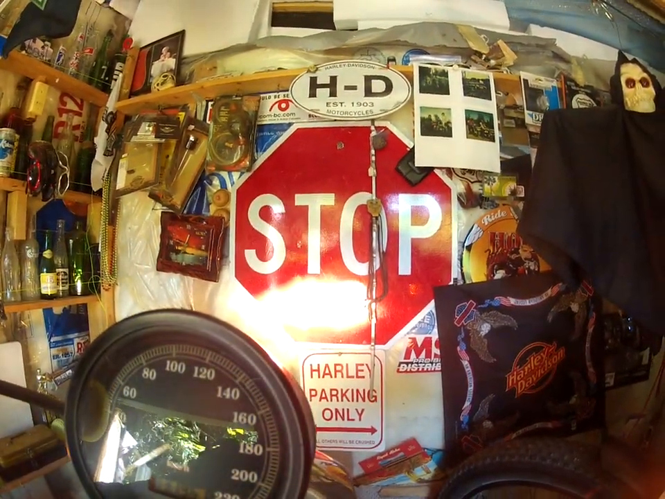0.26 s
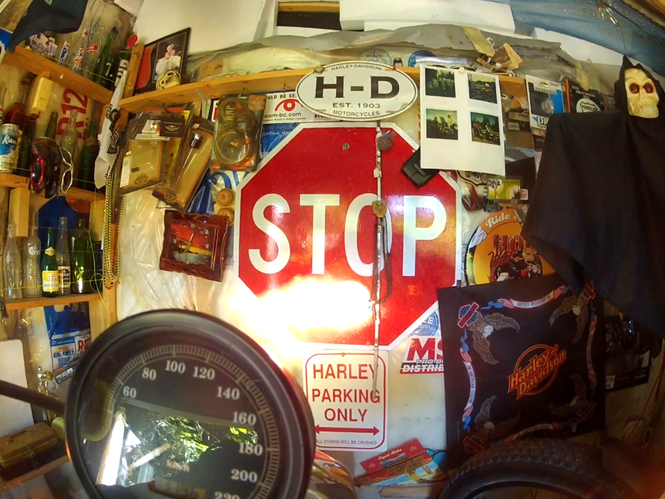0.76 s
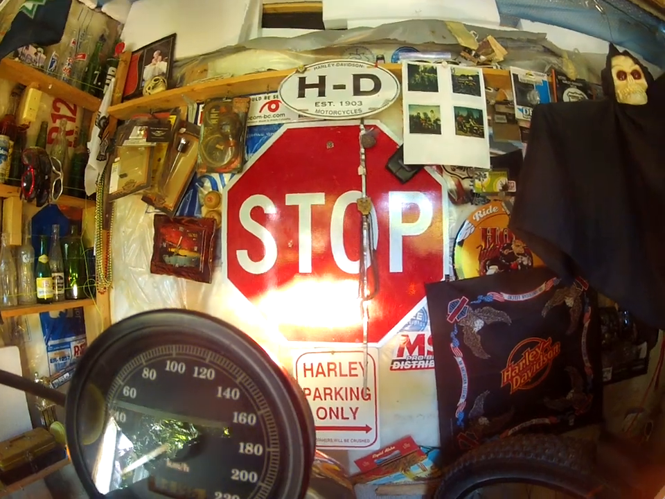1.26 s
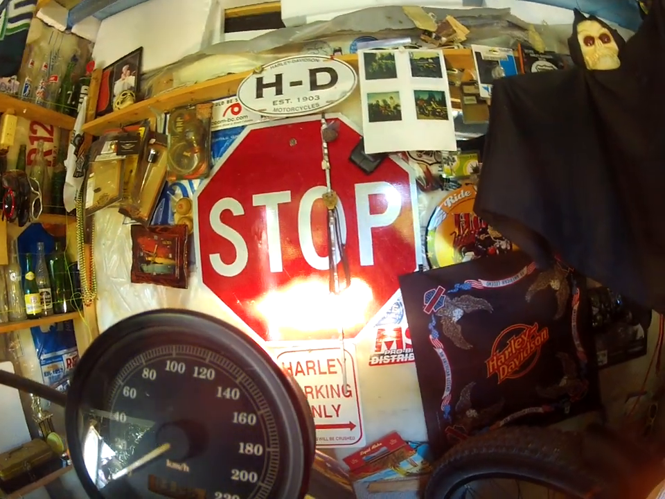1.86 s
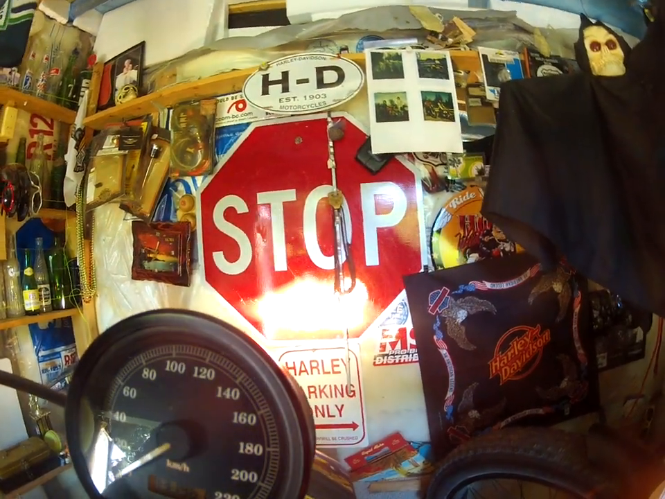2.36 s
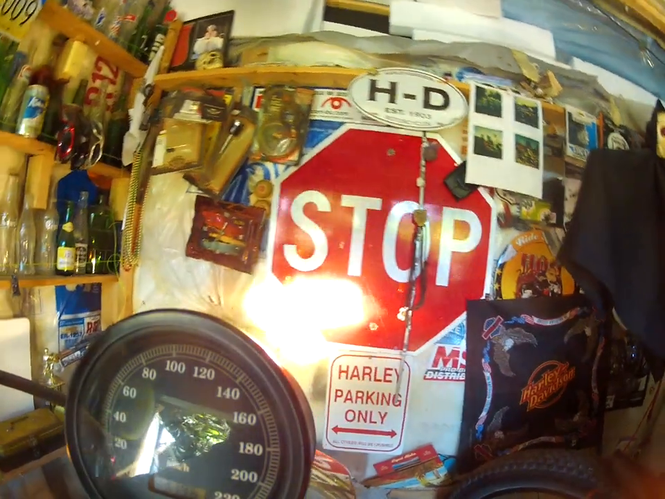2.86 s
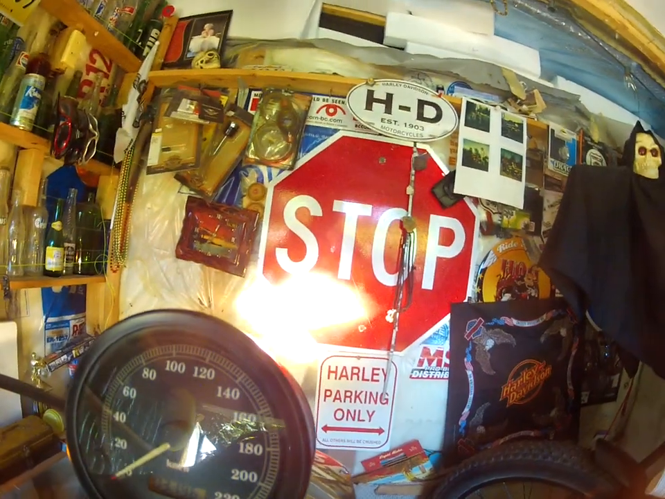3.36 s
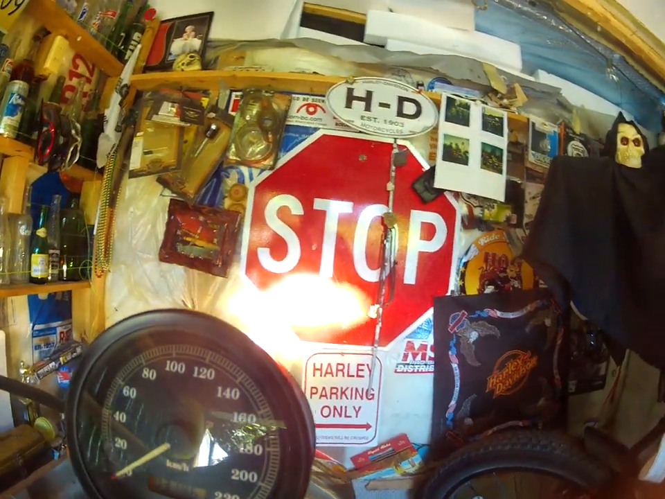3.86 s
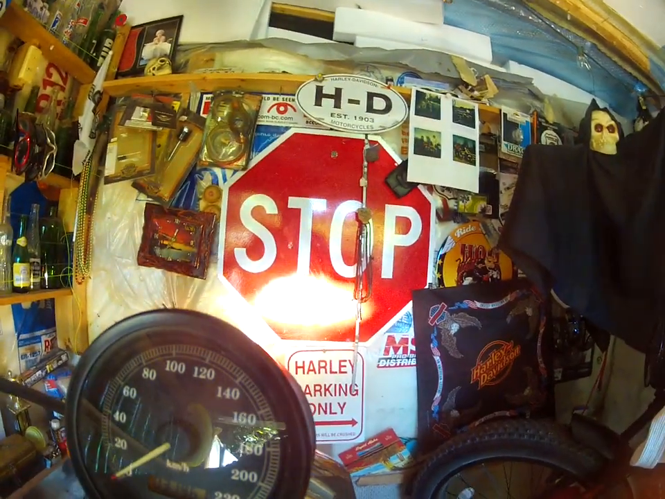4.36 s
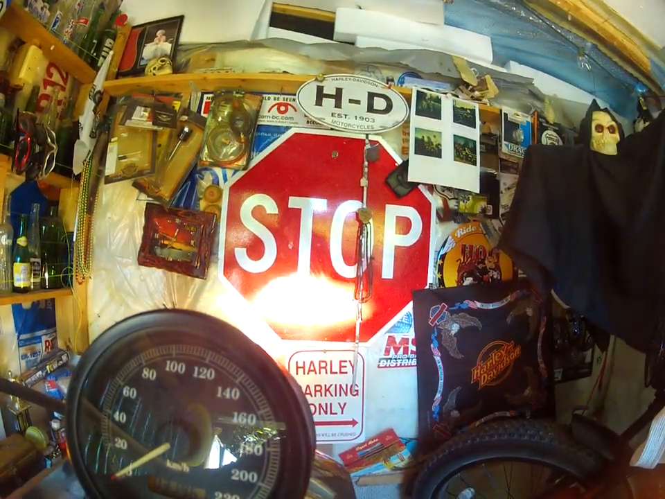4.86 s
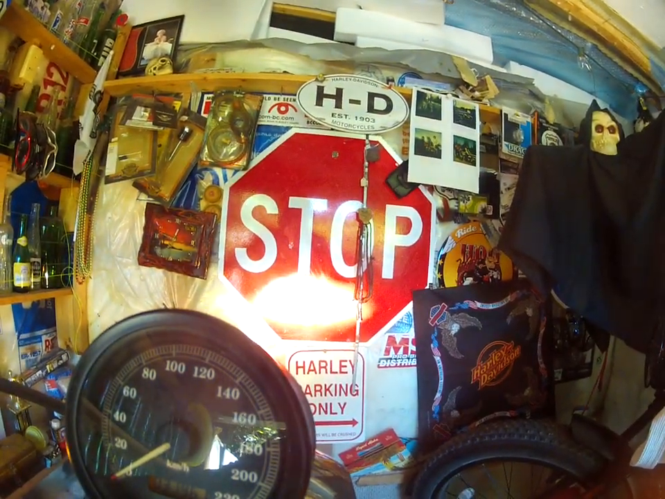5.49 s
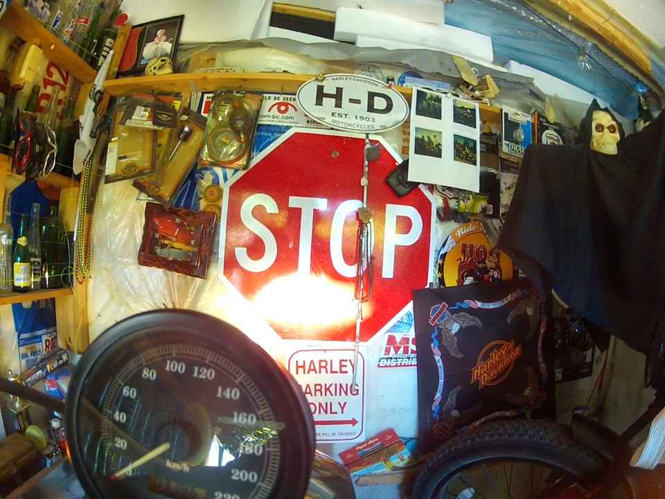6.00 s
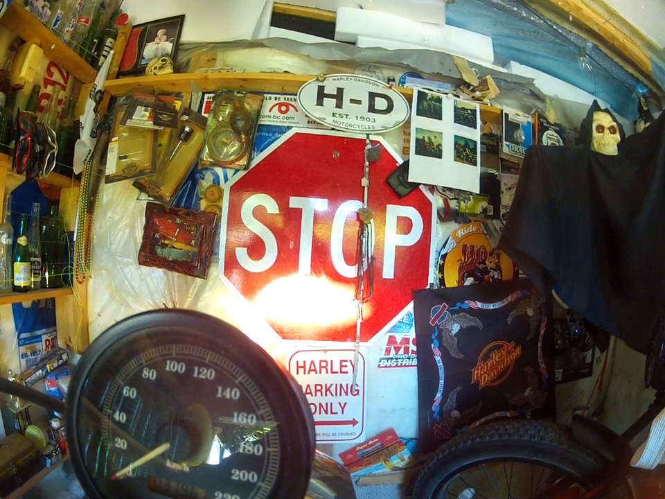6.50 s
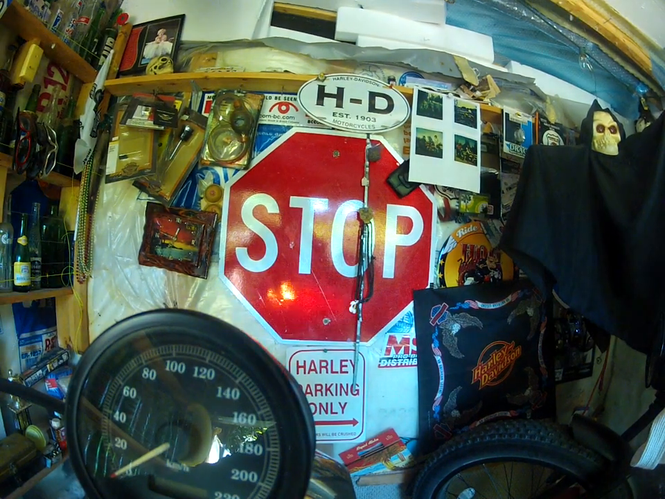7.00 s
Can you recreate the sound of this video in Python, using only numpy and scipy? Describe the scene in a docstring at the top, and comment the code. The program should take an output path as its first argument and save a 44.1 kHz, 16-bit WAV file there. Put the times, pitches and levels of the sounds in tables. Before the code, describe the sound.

Heard from a small camera on the motorcycle, a heavy engine chugs at fast idle, about nine lumpy cycles a second, with low exhaust throb, droning hollow resonance and hard metallic rattling. A few sharp clicks occur near the microphone. Then a loud switch snap momentarily ducks the sound and the engine runs down over a second and a half: irregular clanks, wavering low tones and light ticks, ending nearly silent in the small shed.

```python
"""A V-twin engine idles in a small shed, heard by a small camera on the machine; a switch clicks and it runs down.
Exhaust: boom of two low crank orders. Firings: thump and drone of two groups of hollow modes.
Valve gear: struck and rattled case modes, pings, a loose tick; knocks and bright ticks as it stops.
The camera ducks after loud clicks, clips, and holds each sample of a slow converter, mirroring sound in the treble."""
import sys
import numpy as np
from scipy import signal
from scipy.fft import rfft, irfft
from scipy.io import wavfile
from scipy.ndimage import uniform_filter1d

SR = 44100
rng = np.random.default_rng(int(sys.argv[2]) if len(sys.argv) > 2 else 0)


def log_audio(samples):
    """Write samples as a 16-bit WAV file to the path given in sys.argv[1]."""
    # one column per channel
    frames = np.atleast_2d(samples).T
    # limit to full scale, then quantise
    limited = np.clip(frames, -1, 1)
    pcm = np.round(limited * 32767).astype(np.int16)
    wavfile.write(sys.argv[1], SR, pcm)


N = 319284


def amp(db):
    """dB to gain."""
    return 10 ** (np.asarray(db) / 20)


def rms_one(x):
    """Scale to rms 1."""
    return x / np.sqrt(np.mean(x ** 2) + 1e-20)


def in_time(rows):
    """Table columns as signals, interpolated over time."""
    s, *columns = np.transpose(rows)
    return [np.interp(np.arange(N) / SR, s, c) for c in columns]


def waver(length):
    """Slow random signal, smoothed twice over length samples; rms 1."""
    once = uniform_filter1d(rng.standard_normal(N), length)
    return rms_one(uniform_filter1d(once, length))


def evened(x, seconds):
    """Divide out slow random swells; rms 1."""
    power = uniform_filter1d(x ** 2, max(int(seconds * SR), 1))
    return rms_one(x / np.sqrt(power + 0.026 * np.mean(x ** 2)))


def band(x, low_hz, high_hz, order=2):
    """Butterworth band-pass."""
    return signal.sosfilt(signal.butter(order, [low_hz, high_hz], "band", fs=SR, output="sos"), x)


def resonance(x, hz, width_hz):
    """Two-pole resonance; a unit click rings at height 1."""
    r, w = np.exp(-np.pi * width_hz / SR), 2 * np.pi * hz / SR
    return signal.lfilter([0, np.sin(w)], [1, -2 * r * np.cos(w), r * r], x + 1e-18)


def clicks_at(seconds, sizes):
    """Click train."""
    out = np.zeros(N)
    np.add.at(out, np.clip((np.asarray(seconds) * SR).astype(int), 0, N - 1), sizes)
    return out


# crank position, idling: (time [s], four-stroke cycles done [1])
IDLE_CRANK = [(0.0, 0.03), (0.3, 2.896), (0.6, 5.788), (0.9, 8.653), (1.2, 11.455), (1.5, 14.277),
              (1.8, 17.015), (2.1, 19.767), (2.4, 22.565), (2.7, 25.474), (3.0, 28.23), (3.3, 31.03),
              (3.6, 33.761), (3.9, 36.511), (4.2, 39.222), (4.5, 41.956), (4.8, 44.689), (5.1, 47.447),
              (5.4, 50.294), (5.7, 53.12)]
# crank position, running down after the ignition is cut: (time [s], four-stroke cycles done [1])
COAST_CRANK = [(5.949, 55.4), (6.199, 57.3), (6.502, 59.1), (6.799, 60.4), (7.24, 61.5)]


def each_cycle(places, jitter):
    """Times (cycle x place) at which the crank passes the places, scattered by jitter [cycles]."""
    s, cycles = np.transpose(IDLE_CRANK + COAST_CRANK)
    due = np.arange(0, 62)[:, None] + np.asarray(places)
    due = due + jitter * rng.standard_normal(due.shape)
    return np.interp(due, cycles, s, left=9, right=9)   # 9 s: past the turning


def crank_cycles():
    """Crank position as a signal [cycles]."""
    return in_time(IDLE_CRANK + COAST_CRANK)[0]


# swell with the crank: (times a cycle [1], place of the crest [cycle], depth [dB])
CRANK_SWELL = [(1, 1, 0), (2, 0.02, 0.5), (4, 0.014, 0.5)]


def chug():
    """Gain that follows the crank."""
    cycles = crank_cycles()
    swell_db = sum(db * np.cos(2 * np.pi * round(times) * (cycles - crest)) for times, crest, db in CRANK_SWELL)
    return amp(swell_db)


# broad mechanical noise spectrum: (frequency [Hz], relative density [dB per Hz])
BED_SPECTRUM = [(20, -5), (60, 0), (75, -8), (95, 3.5), (118, -8.5), (300, -14.5), (550, -11), (1500, -23),
                (2200, -14), (2700, -32.5), (3800, -38.5), (4200, -38.5), (6000, -48.5)]


def bed(level_db):
    """Broad mechanical noise: white noise shaped to the spectrum."""
    hz = np.maximum(np.fft.rfftfreq(N, 1 / SR), 1)
    at_hz, density_db = np.transpose(BED_SPECTRUM)
    shape = amp(np.interp(np.log(hz), np.log(at_hz), density_db))
    return amp(level_db - 7.5) * rms_one(irfft(rfft(rng.standard_normal(N)) * shape, N))


def burst(s, db, hz, length_s, rough):
    """A ring of a few milliseconds, roughened by noise; returns its sample indices and the ring."""
    t = np.arange(N)[int(s * SR):int((s + length_s) * SR)]
    done = np.linspace(0, 1, len(t))
    swell = np.sin(np.pi * done ** 0.74) ** 1.96
    grit = uniform_filter1d(rng.standard_normal(len(t)), size=4) * rough
    return t, amp(db) * swell * (np.sin(2 * np.pi * hz * length_s * done) + grit)


# loose part ticking: (time [s], level [dB])
LOOSE_TICKS = [(0.96, -18), (1.1, -22), (1.16, -10.5), (1.28, -8.5), (1.4, -11), (1.74, -11.5), (1.79, -24),
               (1.85, -15), (2.07, -13), (2.18, -11.5), (2.23, -25), (2.29, -9.5), (2.44, -8.5),
               (2.55, -9.5), (2.72, -15)]
# its two ticks: place [cycle]
LOOSE_PLACES = (.462, .966)


def loose_ticks():
    """A loose part ticks twice a cycle while shaken loose; pitch scatters, level follows the table."""
    s, db = np.transpose(LOOSE_TICKS)
    at = each_cycle(LOOSE_PLACES, jitter=0.008).ravel()
    hz = 1973 + 23 * rng.standard_normal(len(at))
    return [(a - .001, np.interp(a, s, db), h, .005, .08)
            for a, h in zip(at, hz) if s[0] < a < s[-1]]


# sharp clicks near the microphone, last one the switch:
# (time [s], level [dB], pitch [Hz], length [s], roughness [1])
SHARP_CLICKS = [(2.1057, -3, 1100, 0.0086, 0.15), (2.1066, -2.5, 1430, 0.0016, 0.26),
                (2.1084, 6.5, 1844, 0.0029, 0.32), (5.7, 15.5, 1862, 0.005, 0.46)]


def ticks_and_clicks():
    """Small hard parts close by ring at one pitch each."""
    out = np.zeros(N)
    for row in loose_ticks() + SHARP_CLICKS:
        t, ring = burst(*row)
        out[t] += ring
    return out


def struck(seconds, db, struck_hz, hz, reach_db, spread_db):
    """Clicks for one mode, reach_db weaker per octave from the struck pitch; random size and sign."""
    draw = rng.standard_normal(np.shape(seconds) + (2,))
    size_db = db - reach_db * np.abs(np.log2(hz / struck_hz)) + spread_db * draw[..., 0]
    return clicks_at(seconds, amp(size_db) * np.sign(draw[..., 1]))


def case_mode(x, hz, width_hz):
    """Case mode with steep flanks and a soft start; a unit click rings near height 1."""
    return resonance(resonance(x, hz, width_hz), hz, 4.67 * width_hz) * 8 * np.pi * width_hz / SR


# engine case modes: (frequency [Hz], width [Hz], relative level [dB])
CASE_MODES = [(647.4, 45, -11), (762, 41, -7), (837, 29.4, -4), (917, 41, -4.5), (1076, 106, -4),
              (1168, 47, -9.5), (1260, 47, -13.5), (1431.5, 99, -6), (1650, 120, -14.5), (1888, 123, -10.5),
              (2459, 90, -22), (3214, 106, -29.5), (3666, 133, -31.5)]
# thin bright ticks of the stopping engine: (time [s], relative level [dB])
BRIGHT_TICKS = [(5.7937, -43), (5.8875, -31), (5.9479, -39), (6.0492, -46), (6.0896, -40), (6.2068, -33),
                (6.2257, -38), (6.2507, -30), (6.2861, -39), (6.4075, -42), (6.4637, -39), (6.4767, -32),
                (6.5131, -36), (6.565, -44), (6.5999, -50), (6.6363, -51), (6.7052, -42), (6.7382, -47),
                (6.787, -39), (6.8074, -34), (6.8652, -38), (6.9042, -41), (6.9262, -47), (6.9475, -41),
                (7.01, -46), (7.056, -52), (7.0758, -46), (7.21, -40)]


def bright_ticks():
    """Light contacts ring only the two highest case modes, with a short broad scrape."""
    s, db = np.transpose(BRIGHT_TICKS)
    rings = sum(case_mode(struck(s, db - 0.5, hz, hz, reach_db=0, spread_db=3), hz, 2 * width_hz)
                for hz, width_hz, _ in CASE_MODES[-2:])
    decay = np.exp(-1 / (.009 * SR))   # 9 ms
    puff = signal.lfilter([1], [1, -decay], clicks_at(s, amp(db - 16.0)) + 1e-18)
    scrape = band(rng.standard_normal(N), 2300., 5800.)
    return rings + puff * rms_one(scrape)


# last knocks of the stopping engine: (time [s], relative level [dB], pitch struck hardest [Hz])
LAST_KNOCKS = [(5.799, -1, 1430), (5.882, -9, 1110), (5.914, -23, 1070), (5.96, -17, 947),
               (6.01, -1.5, 1200), (6.047, 1, 1240), (6.11, -7, 920), (6.162, -6.5, 1410), (6.186, -5, 899),
               (6.21, -1, 1420), (6.348, -7, 1097), (6.376, -10, 910), (6.409, 0, 1410), (6.463, -5.5, 925),
               (6.499, -8, 848), (6.556, -13.5, 896), (6.602, -5.5, 1397), (6.706, -0.5, 1410),
               (6.623, -16, 1450), (6.77, -14, 866.6), (6.787, -7, 940), (6.832, -20.5, 800),
               (6.926, -19.5, 940), (6.972, -19, 896), (7.015, -17, 1380), (7.076, -6, 898),
               (7.209, -22.5, 880)]


def knocks():
    """Each knock strikes the case modes around its pitch, then bounces twice."""
    s, db, struck_hz = np.transpose(LAST_KNOCKS)
    s = s[:, None] + np.array([0, .004, .011])
    db = db[:, None] + np.array([0, -3., -6.])
    out = 0
    for hz, width_hz, mode_db in CASE_MODES:
        hits = struck(s, db, struck_hz[:, None], hz, reach_db=10.5, spread_db=2)
        out = out + amp(.5 * mode_db - 7.0) * case_mode(hits, hz, width_hz)
    return out


# valve-gear pings: (time [s], main ping relative level [dB], leading ping relative level [dB])
PING_LEVELS = [(0.0, -16.5, -19), (0.6, -11.5, -27), (1.2, -17.5, -26), (1.8, -12, -17), (2.7, -15.5, -31),
               (3.3, -12.5, -16), (4.0, -12, -14.5), (5.0, -11.5, -15), (5.7, -13, -16)]


def pings():
    """One case mode struck at two places in the cycle while idling, then by the last knocks."""
    ping_hz, ping_width_hz = 1412., 35.4
    s, *levels = np.transpose(PING_LEVELS)
    at = each_cycle((.015, .745), jitter=0.0068)
    db = np.transpose([np.interp(a, s, level) for a, level in zip(at.T, levels)])
    sizes = amp(db + 5.0 + 2.5 * rng.standard_normal(at.shape)) * (at < s[-1])
    knock_s, knock_db, struck_hz = np.transpose(LAST_KNOCKS)
    late = struck(knock_s, knock_db - 7.5, struck_hz, ping_hz, reach_db=24, spread_db=0.0)
    return case_mode(clicks_at(at, sizes) + late, ping_hz, ping_width_hz)


# valve gear contacts, once a cycle: (place [cycle], pitch struck hardest [Hz], relative level [dB])
VALVE_CONTACTS = [(0.96, 930, -1), (0.099, 2600, -2), (0.26, 5600, 9), (0.25, 670, -3.5), (0.41, 3200, 1.5),
                  (0.47, 900, -7), (0.6, 1200, -4.5), (0.76, 1000, -6.5), (0.915, 2760, 1), (.9, 980, -8)]


def valve_gear(level_db, rattle_per_s, rattle_db):
    """Looped contacts strike the case modes nearest their pitch; random rattle fills the gaps."""
    places, struck_hz, db = np.transpose(VALVE_CONTACTS)
    at, out = each_cycle(places, jitter=.006), 0
    swell = chug()
    looping = np.arange(N) / SR < COAST_CRANK[0][0]   # the even loop ends as the engine slows
    for hz, width_hz, mode_db in CASE_MODES:
        hits = struck(at, db, struck_hz, hz, reach_db=19.0, spread_db=2.0) * looping
        rattle = (rng.random(N) < rattle_per_s / SR) * rng.standard_normal(N)
        rattle = rattle * amp(rattle_db) * swell
        out = out + amp(mode_db) * rms_one(case_mode(hits + rattle, hz, width_hz))
    return amp(level_db + 1.0) * rms_one(out)


# firings: (place [cycle], relative level [dB])
FIRING_PULSES = [(0.515, -1), (0.935, 0.5)]


def hollow(modes, level_db, pulse_db, even_s):
    """Uneven firings and steady shaking drive a group of low modes."""
    places, db = np.transpose(FIRING_PULSES)
    at, out = each_cycle(places, jitter=0.0146), 0
    for hz, width_hz, mode_db in modes:
        pulses = clicks_at(at, amp(db + pulse_db + 3.3 * rng.standard_normal(at.shape)))
        once = resonance(pulses + rng.standard_normal(N) / 40, hz, width_hz)
        out = out + amp(mode_db) * rms_one(resonance(once, hz, 3.4 * width_hz))   # steep flanks
    return amp(level_db) * evened(out, even_s)


def hum(hz, wander_hz):
    """Strongest ring of a hollow: a tone of randomly wandering pitch; rms 1."""
    return np.sqrt(2) * np.sin(2 * np.pi * np.cumsum(hz + wander_hz * waver(900)) / SR)


# hollow modes: (frequency [Hz], width [Hz], relative level [dB])
THUMP_MODES = [(166, 190, -28), (179.5, 28.2, 7.5), (209, 22.5, 3.5), (230.3, 10.2, -5)]
DRONE_MODES = [(367.1, 26.3, -2.5), (400, 23, -5), (451.2, 33.5, -11)]
# hollow levels: (time [s], thump relative level [dB], drone relative level [dB])
HOLLOW_LEVELS = [(0.0, -12.5, -20), (0.2, -11.5, -24), (0.5, -11, -20.5), (0.75, -11.5, -21.5),
                 (1.0, -12, -24.5), (1.25, -15.5, -21), (1.45, -13.5, -23.5), (2.05, -12, -20.5),
                 (2.4, -13.5, -23), (2.68, -12, -22), (3.0, -10.5, -22), (3.3, -12.5, -18.5),
                 (3.95, -14, -22.5), (4.7, -14.5, -21), (5.05, -15.5, -24.5), (5.2, -15, -19.5),
                 (5.68, -12.5, -22), (5.81, -15, -20), (5.92, -14.5, -24.5), (6.0, -16.5, -21.5),
                 (6.08, -14.5, -18), (6.18, -21.5, -16), (6.23, -15.5, -9), (6.29, -10, -10.5),
                 (6.32, -18.5, -21), (6.35, -14, -13.5), (6.4, -19, -15.5), (6.46, -24, -17),
                 (6.57, -9.5, -26.5), (6.63, -8, -21), (6.69, -16, -28), (6.76, -10.5, -21),
                 (6.83, -9, -22), (6.87, -14, -22.5), (6.91, -24, -35), (7.02, -23, -30.5),
                 (7.08, -19.5, -39), (7.14, -27, -39), (7.19, -19, -42), (7.24, -14, -47)]
# strongest rings, drifting as the engine stops: (time [s], thump pitch [Hz], drone pitch [Hz])
HOLLOW_PITCH = [(0.0, 180.1, 374), (5.9, 182.8, 376), (6.16, 200.3, 430), (6.24, 194.3, 395.6),
                (6.3, 186.3, 370.6), (6.42, 187.2, 334.4), (6.57, 173.7, 382), (6.85, 180.7, 365),
                (6.92, 166.4, 380), (7.24, 168, 380)]


def thump_and_drone():
    """Two hollows: driven modes plus a hum each; the rough share drops as the engine runs down."""
    firing, = in_time([(COAST_CRANK[0][0], 1), (COAST_CRANK[1][0], 0)])
    thump_db, drone_db = (db + 1.69 * waver(1500) for db in in_time(HOLLOW_LEVELS))
    # swells twice a cycle
    thump_db = thump_db + firing * 0.5 * np.cos(4 * np.pi * (crank_cycles() - 0.0033))
    thump_hz, drone_hz = in_time(HOLLOW_PITCH)
    rough_db, wander = -5 * (1 - firing), 0.38 + 0.607 * firing
    thump = hollow(THUMP_MODES, thump_db + rough_db - 3.0, pulse_db=1.5, even_s=0.13)
    thump = thump + amp(thump_db - 5.5) * hum(thump_hz, wander_hz=6. * wander)
    thump = band(thump, 138., 265., order=4)   # dark on both sides
    drone = hollow(DRONE_MODES, drone_db + rough_db - 1.0, pulse_db=-7.5, even_s=0.045)
    drone = drone + amp(drone_db - 6.5) * hum(drone_hz, wander_hz=14.02 * wander)
    return thump + drone


# exhaust boom: (time [s], order four level [dB], order five level [dB])
BOOM_ORDERS = [(0.0, -15, -26), (0.5, -12.5, -28), (1.0, -19, -25), (1.4, -15, -24), (2.0, -17.5, -18.5),
               (2.3, -19, -30), (2.6, -13.5, -33), (3.0, -14.5, -20), (3.3, -18.5, -34), (3.6, -17, -17.5),
               (3.95, -19, -23.5), (4.15, -17, -25), (4.45, -19, -21), (5.4, -16.5, -24.5),
               (5.7, -13.5, -26)]
# crest of each order: place [cycle]
ORDER_CRESTS = (.455, .47)
# shed's lowest resonance, ringing on in fading swells: (time [s], level [dB])
SHED_RING = [(5.7, -7), (5.9, -19), (6.03, -16), (6.09, -32), (6.16, -18.5), (6.31, -29), (6.43, -17),
             (6.53, -39), (6.6, -23.5), (6.77, -28), (6.83, -37), (7.2, -42), (7.24, -27)]


def boom():
    """Two crank orders fall on the shed's lowest resonance, which rings on unevenly after the cut."""
    cycles = crank_cycles()
    firing = np.arange(N) / SR < SHARP_CLICKS[-1][0]
    orders = sum(amp(db + 1.5 * waver(2500)) * np.cos(2 * np.pi * k * (cycles - crest))
                 for k, db, crest in zip((4, 5), in_time(BOOM_ORDERS), ORDER_CRESTS))
    shed_hz = 43.4
    ring = resonance(resonance(rng.standard_normal(N), shed_hz, 8.2), shed_hz, 8.3)
    after = amp(in_time(SHED_RING)[0]) * evened(ring, 0.081)
    share = uniform_filter1d(firing * 1., SR // 20)   # 50 ms crossfade
    return np.sqrt(2) * share * orders + (1 - share) * after


# mechanical noise: (time [s], relative level [dB])
CLATTER_LEVEL = [(0.0, -18.5), (2.3, -19.5), (3.0, -19), (5.6, -19), (5.89, -18), (6.05, -22),
                 (6.31, -22.5), (6.43, -25), (6.68, -30), (6.8, -30), (6.92, -32.5), (7.12, -42),
                 (7.24, -51)]


def scene():
    """Sum of all sources, the same in both channels."""
    clatter_db, = in_time(CLATTER_LEVEL)
    noise = chug() * bed(clatter_db)
    metal = valve_gear(clatter_db, rattle_per_s=500., rattle_db=-13.0)
    metal = metal + pings() + knocks() + bright_ticks()
    return np.tile(noise + ticks_and_clicks() + metal + thump_and_drone() + boom(), (2, 1))


def duck(x, rate_hz, above_db, release_db_s, attack_s):
    """Gain control: cuts peaks above the threshold, looks 2.5 ms ahead, recovers linearly in dB."""
    t = np.arange(len(x)) / rate_hz
    over_db = np.maximum(20 * np.log10(np.abs(x) + 1e-9) - above_db, 0)
    held_db = np.maximum.accumulate(over_db + release_db_s * t) - release_db_s * t
    held_db = np.append(held_db[30:], held_db[-30:])
    r = np.exp(-1 / (rate_hz * attack_s))
    return x * amp(-signal.lfilter([1 - r], [1, -r], held_db))


def side_noise(x):
    """Faint low noise, its level rising steeply with that of the sound at 700-2500 Hz."""
    low = signal.sosfilt(signal.butter(6, 330., fs=SR, output="sos"), rng.standard_normal(N))
    follow = uniform_filter1d(np.abs(band(x, 700., 2500.)), int(.012 * SR)) ** 2.16
    return amp(-40.5) * rms_one(follow * signal.lfilter([1], [1, -.99], low))


def record(dry):
    """Gain control, clipping, flat-held 12 kHz samples, faint low noise opposite in the channels, top cut."""
    x = signal.resample_poly(dry[0], 40, 147)   # to 12 kHz
    x = duck(x, rate_hz=12000, above_db=0.5, release_db_s=81.5, attack_s=0.0013)
    x = np.clip(x, -.97, .97)
    x = signal.resample_poly(np.repeat(x, 4), 147, 160)[:N]   # held flat at 48 kHz, then to SR
    x = np.pad(x, (0, N - len(x)))
    both = x + side_noise(x) * np.array([[1], [-1]])
    droop = signal.butter(8, 14300., fs=SR, output="sos")   # the converter's own soft roll-off
    top = signal.ellip(10, .3, 70, 15477, fs=SR, output="sos")
    return signal.sosfilt(top, signal.sosfilt(droop, both))


dry = scene()
out = record(dry)
log_audio(out)
```